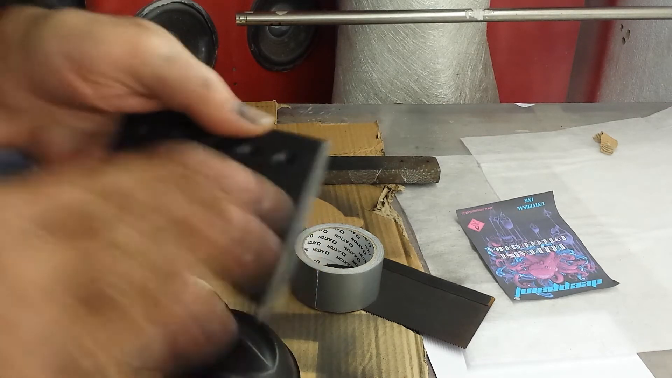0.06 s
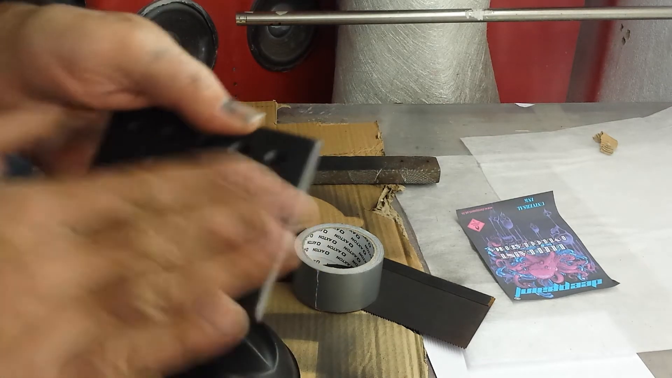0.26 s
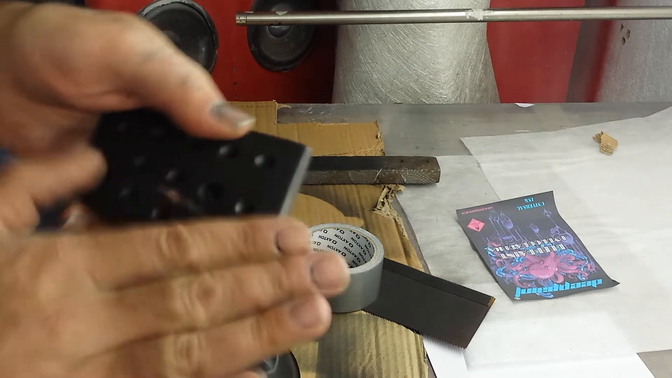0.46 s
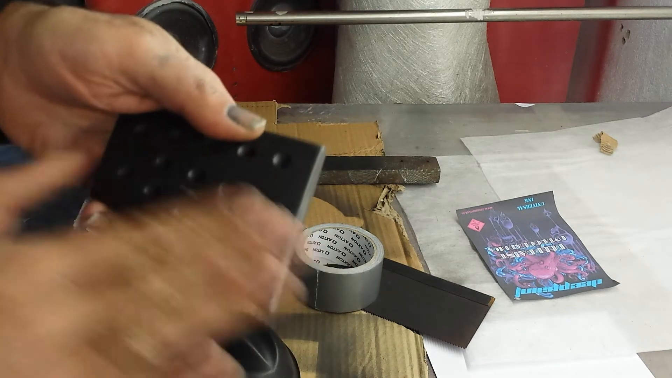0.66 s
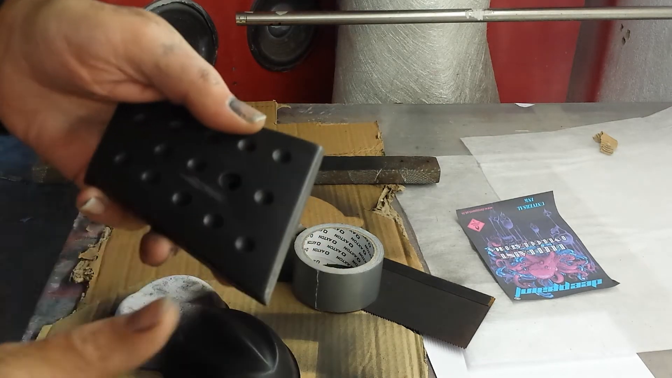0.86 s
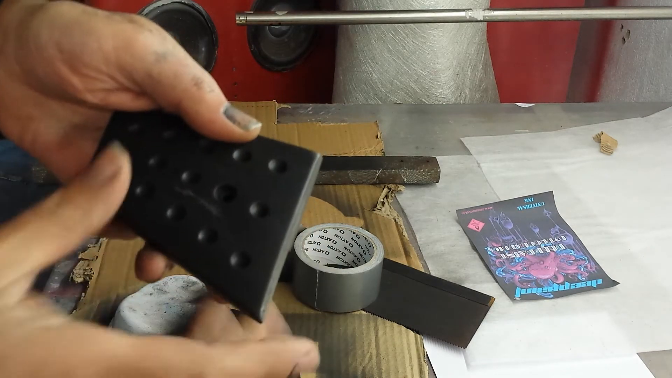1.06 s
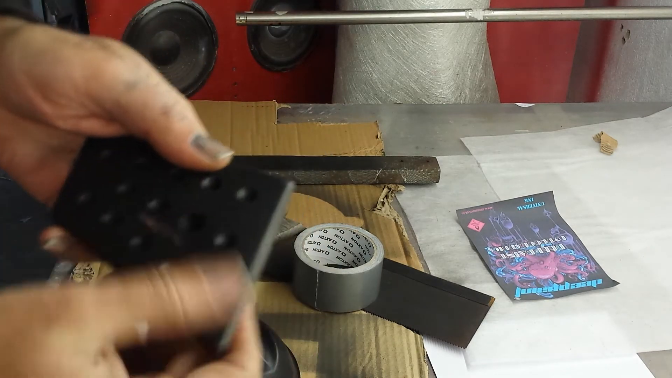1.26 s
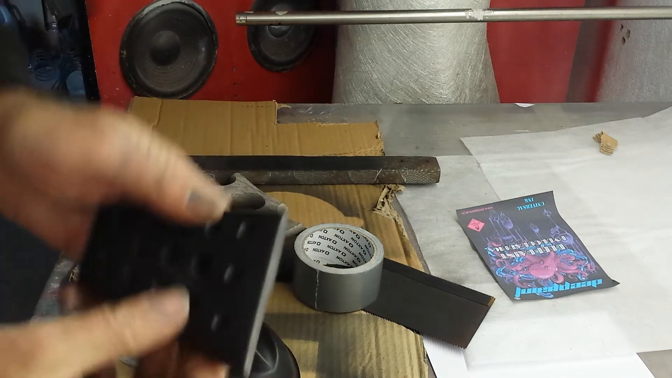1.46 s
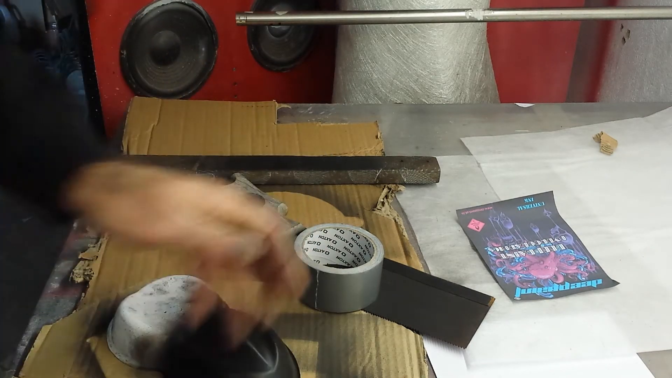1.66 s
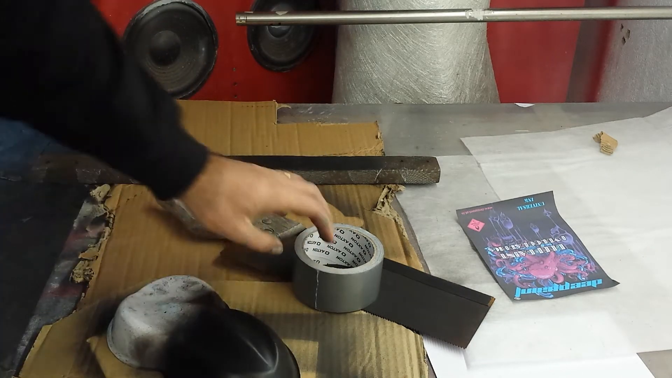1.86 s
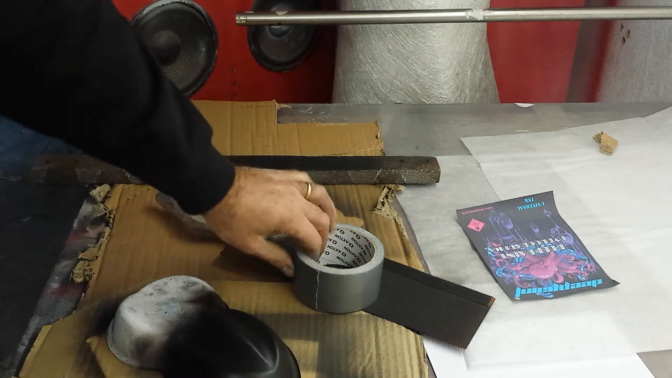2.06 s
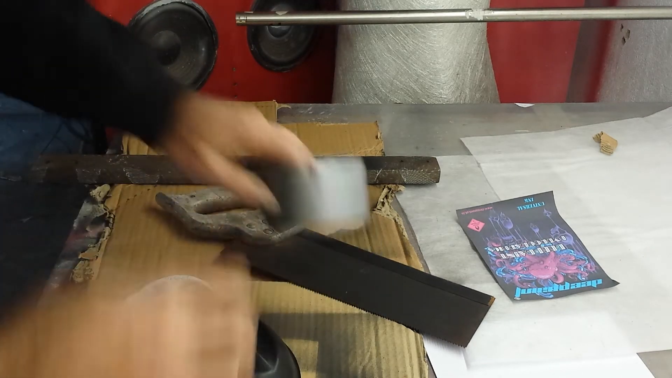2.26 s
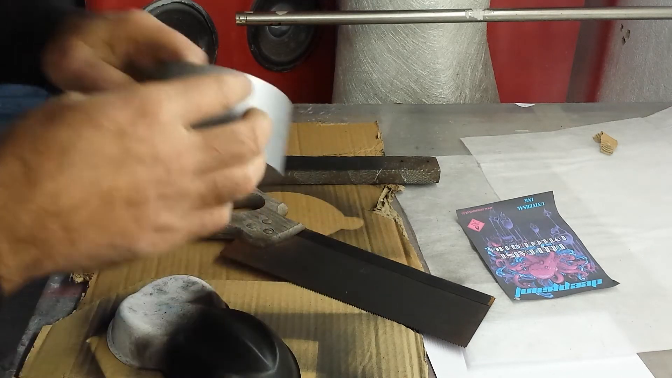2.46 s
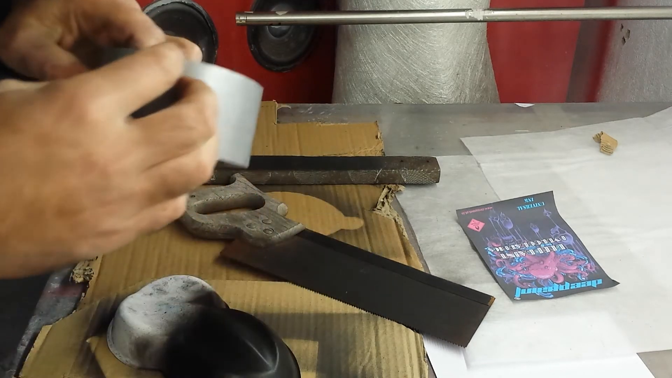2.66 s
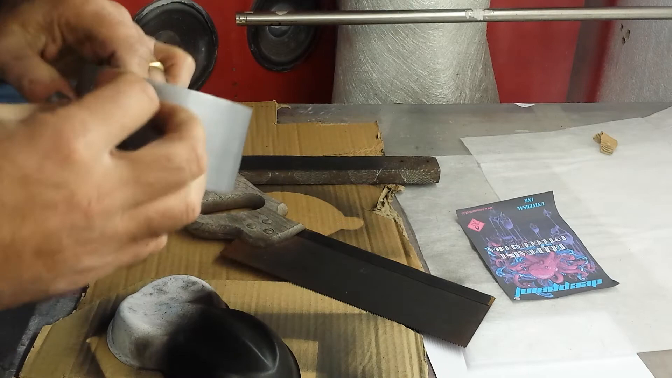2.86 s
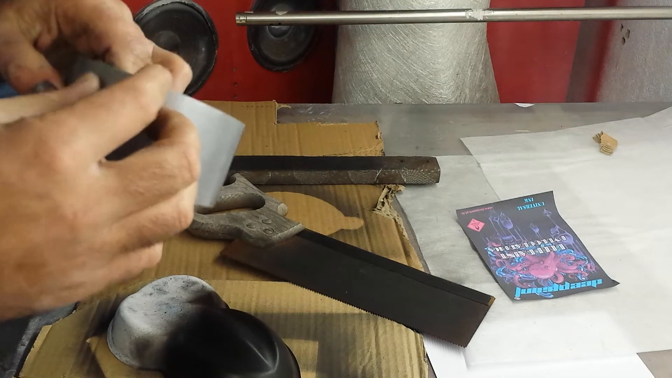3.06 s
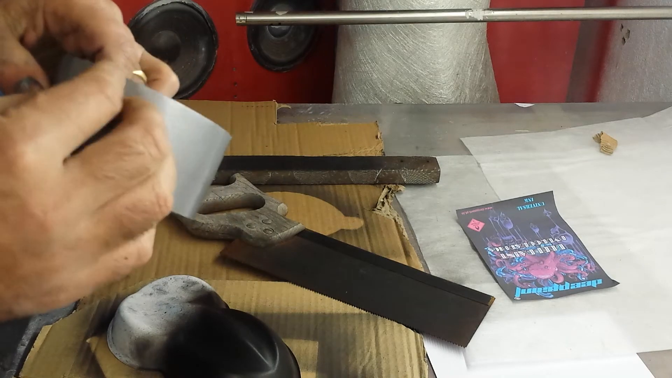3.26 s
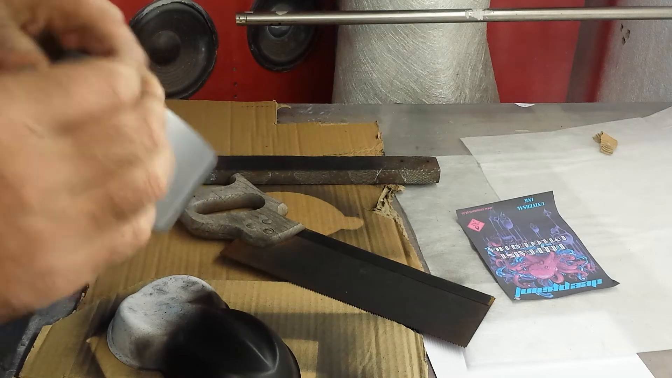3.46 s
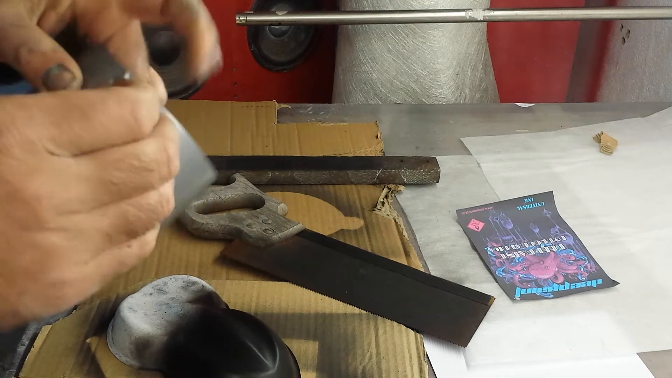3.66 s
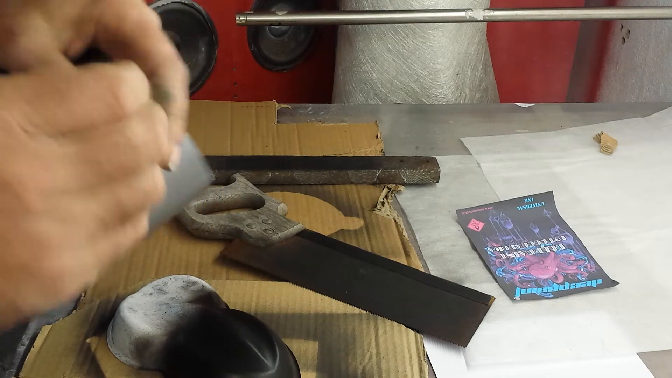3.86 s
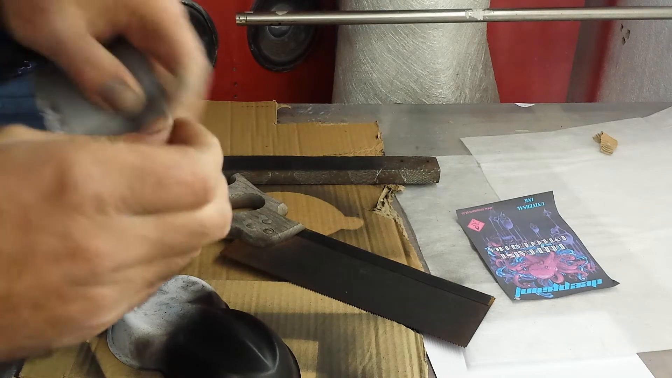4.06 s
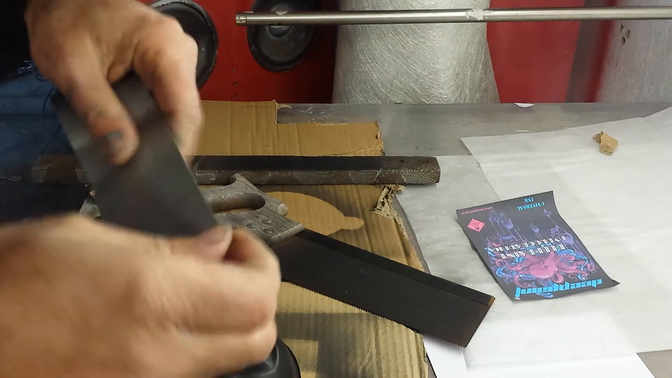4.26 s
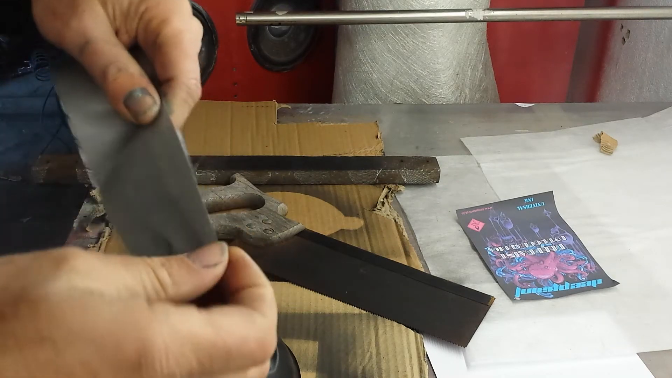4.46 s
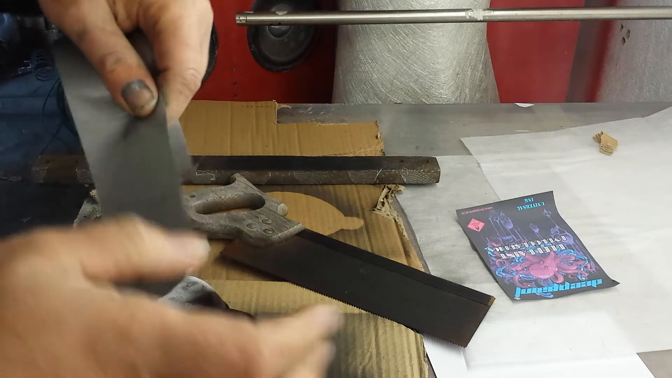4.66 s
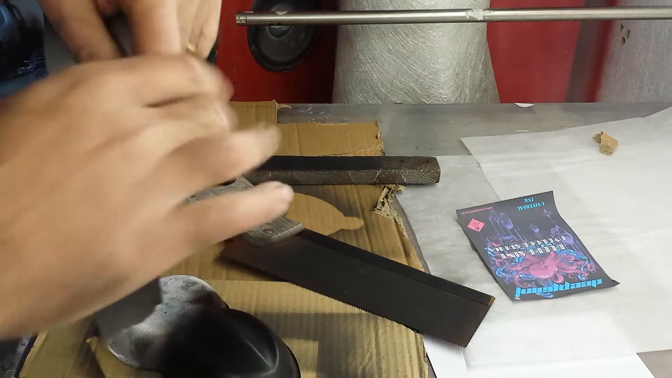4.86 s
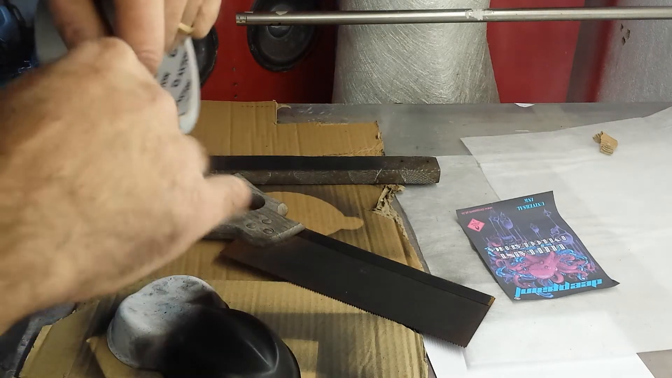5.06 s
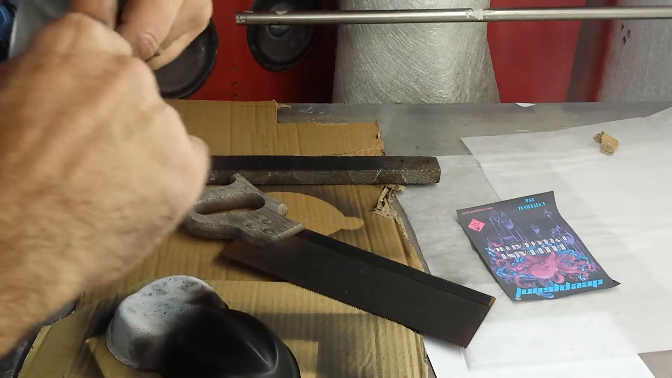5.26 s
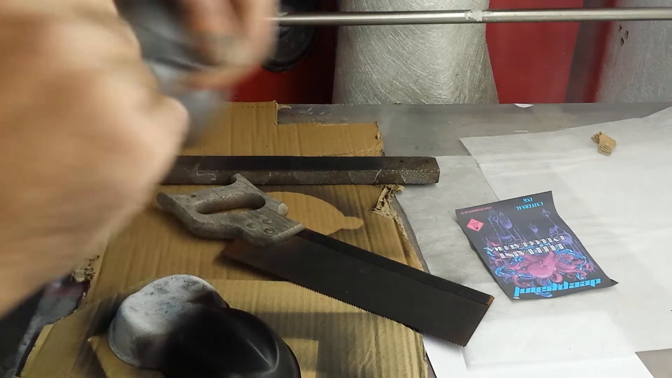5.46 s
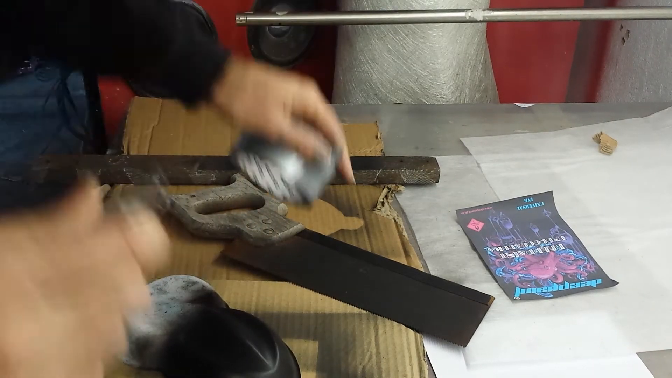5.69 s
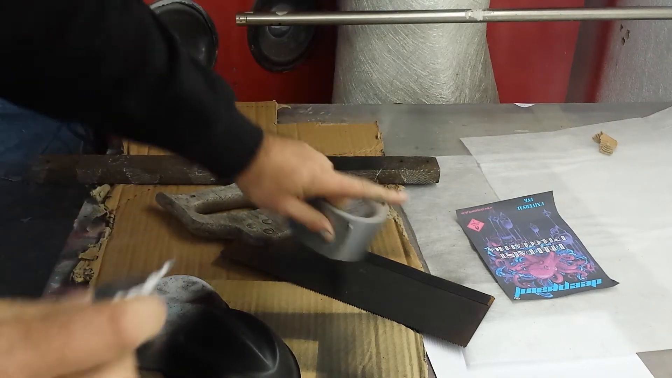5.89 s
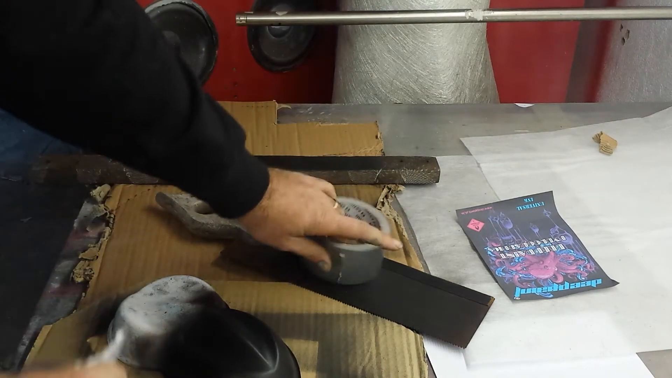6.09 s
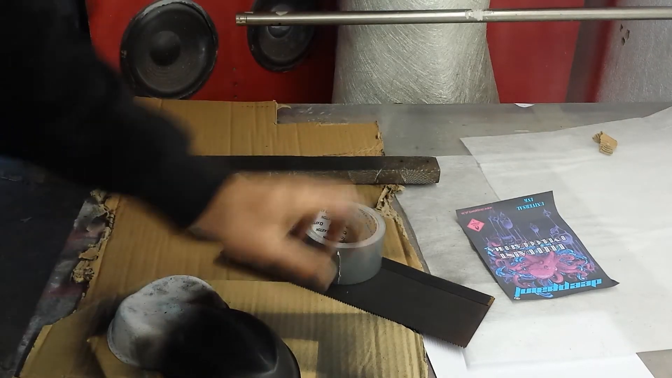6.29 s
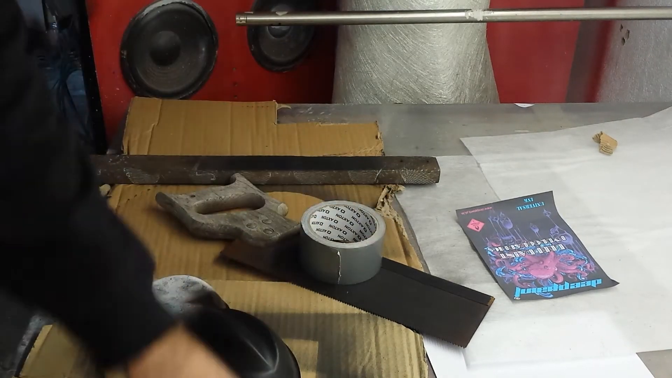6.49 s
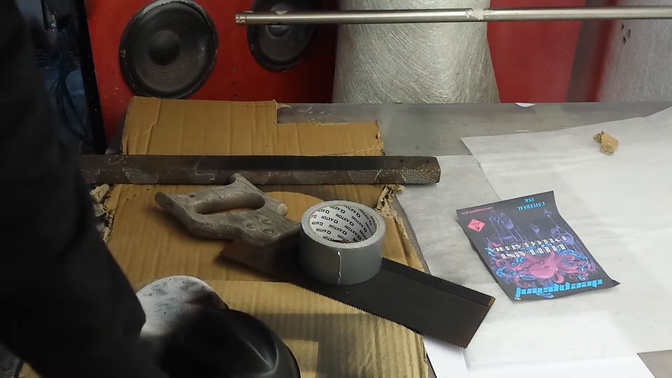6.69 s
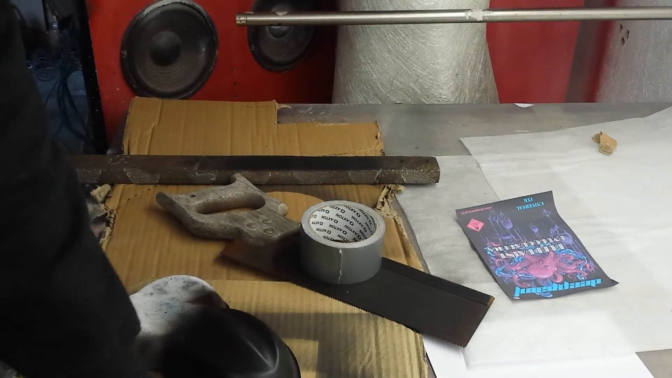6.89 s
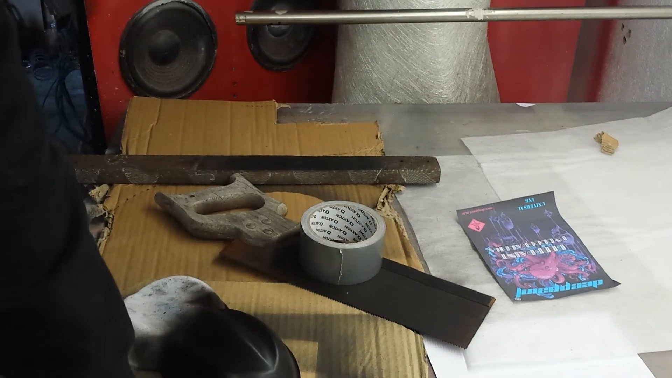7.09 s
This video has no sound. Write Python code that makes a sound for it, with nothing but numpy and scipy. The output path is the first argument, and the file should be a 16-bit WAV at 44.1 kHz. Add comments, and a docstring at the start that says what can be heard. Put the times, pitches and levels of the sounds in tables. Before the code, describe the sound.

Duct tape is ripped off its roll in short loud pulls and torn, between knocks on a workbench, over a faint fan hum.

```python
"""First a palm, close to the stereo microphone, wipes a plate on a workbench and lays it down with two
knocks that ring the bench top and clink a saw lying there. Then duct tape is picked loose, ripped off
its roll in two short pulls and torn across: the glue sticks, slips and snaps, shaking the backing.
The roll is dropped back on the bench and bounces. Behind it all a fan hums faintly in the small workshop."""
import sys
import numpy as np
from scipy import signal
from scipy.fft import rfft, irfft, next_fast_len
from scipy.io import wavfile
from scipy.ndimage import uniform_filter1d

SR = 44100
rng = np.random.default_rng(int(sys.argv[2]) if len(sys.argv) > 2 else 0)


def pcm_store(signal):
    """Save signal as 16-bit PCM."""
    levels = np.round(np.clip(np.atleast_2d(signal), -1, 1) * 32767)
    wavfile.write(sys.argv[1], SR, levels.astype(np.int16).T)


N = 314433
TIME = np.arange(N) / SR

# The tape, close up: two gentle peels, a pull that sticks halfway, the long rip, the tear across.
# Each row: start in seconds, length in seconds, level in dB, attack in seconds per 10 dB, swell in dB,
# slips per second, the slips' share of the power from 0 to 1, strip drumming in dB, rasp pitch in Hz.
TAPE_PULLS = [(3.424, .031, -50, .028, 0, 211, .35, -12, 1300),
              (3.473, .019, -41.5, .007, 0, 300, 0.16, -16, 900),
              (3.771, .031, -29, .003, 7, 450, .25, -7, 1750),
              (3.817, .028, -32, .002, -2, 238, .5, -5.5, 3000),
              (4.057, .101, -22, .001, 0, 206, .9, -0.5, 1580),
              (5.326, .079, -32, .016, 2, 480, .35, -6, 2550)]
# Single snaps. Each row: time in seconds, relative level in dB.
GLUE_JERKS = [(3.815, -10.5), (3.827, -11), (3.84, -14.5), (4.056, -16.5), (4.074, -13.5), (4.145, -13.5),
              (4.157, -16), (5.397, -20), (5.402, -17.5)]  # the glue lets go
DRY_TICKS = [(2.765, -49), (2.7736, -45.5), (3.3732, -46.5), (3.4111, -48), (4.5547, -45), (4.673, -55),
             (5.1609, -35), (5.251, -46), (5.402, -25), (5.7239, -40), (6.1253, -40), (6.132, -41),
             (6.15, -45)]  # handled tape, the tear's last snap, a scrape as the roll lands
# The taut strip. Each row: frequency in Hz, level in dB, time to fall 60 dB (t60) in seconds.
STRIP_MODES = [(340, -7.5, 0.017), (396, 0, 0.05), (457, -13, 0.014), (730, -7.5, 0.039), (887, -21, 0.082)]
# Things set down on the bench. Each row: start in seconds, settling delay in seconds, rebound spacing
# in seconds, weight in dB, clack in dB, hardness as a cutoff in Hz, roll's ring in dB, saw's clink in dB.
BENCH_KNOCKS = [(1.399, .004, .03, -46.5, -47.5, 900, -55, -51),
                (1.881, .002, .031, -23.5, -22.5, 2700, -31, -37),
                (1.999, 0.0019, .041, -17, -24, 1600, -28, -38),
                (6.021, 0.00696, .024, -20.5, -20.5, 1700, -16, -53),
                (6.093, .011, .036, -17, -22, 2200, -16, -36.5),
                (6.522, .016, .04, -29.5, -38.5, 2300, -38, -39.5),
                (6.641, 0.00193, .035, -30.5, -43, 600, -43, -52),
                (6.927, .002, .035, -41, -45, 930, -50, -60),
                (7.086, 0.0039, 0.036, -48, -49, 1500, -52, -50)]
# Ringing bodies. Each row: frequency in Hz, level in dB, t60 in seconds, left over right in dB.
BENCH_MODES = [(168, -26, .12, -19), (215, -12.5, 0.08, 0), (261, -12, 0.1, -8), (304, -13, 0.09, 15.5),
               (409, -13, 0.087, 12), (503, -14, 0.075, 5), (614.3, -15, 0.085, -2), (680, -14, 0.067, 10),
               (970, -18.5, 0.11, -2)]
RESTING_ROLL_MODES = [(72, -4, .17, 4), (172, -12, .12, -3), (254, -10, .12, -6), (398, -10, .08, -2),
                      (570, -17, .07, 1), (945, -20, .08, 2), (1200, -19, .08, 2), (1750, -21, .06, 4)]  # on its cardboard bed
HELD_ROLL_MODES = [(148, -8, 0.054, 3), (181, -3.5, 0.11, -3.5), (285, 0.5, 0.047, 5)]
SAW_MODES = [(1898, -2, 0.095, 9), (1950, -11, 0.11, 12), (1990, -17, 0.14, 5), (2084, -21, 0.22, 5),
             (2630, -16, 0.047, 12)]
# Slow hand slides and brief scuffs on plate or bench.
# Each row: middle in seconds, length in seconds, level in dB.
SLIDES_AND_SCUFFS = [(1.164, 0.72, -62), (1.98, .07, -53), (2.15, 0.25, -57), (6.135, .04, -50)]
# Arms lean on the bench. Each row: start in seconds, end in seconds, rumble in dB.
LEANING_ARMS = [(0, 1.38, -54.5), (6.66, 7.13, -48.5)]
# Tone colours at the microphone. Each row: frequency in Hz, relative spectral density in dB.
TAPE_SPECTRUM = [(100, -23), (260, -6), (560, -3), (750, -1), (1000, -7), (1380, 3), (1750, -2),
                 (2300, -1.5), (3150, -2), (3900, -5), (6000, -7.3), (10000, -16), (15000, -14.5)]
TICK_SPECTRUM = [(400, -25), (1200, 2), (2500, 6), (5000, 5), (9000, -2), (15000, 0.5)]
CLACK_SPECTRUM = [(50, -30), (130, -24), (230, 3), (320, 0), (600, -1), (900, -8.5), (1400, -10.5),
                  (2000, -9.5), (3200, -15.5), (8000, -22), (15000, -8)]
PALM_SPECTRUM = [(40, -18), (110, 0), (190, -5), (400, -1), (900, -9), (1500, -3.5), (2300, 2), (3500, -11),
                 (6000, -10.5), (10000, -16), (15000, -12)]
AIR_SPECTRUM = [(25, -24), (45, 0), (110, -8), (150, -7), (320, -11), (600, -11), (1000, -13),
                (1500, -17.5), (2200, -22.5), (3000, -26), (5000, -31), (10000, -33.5), (15500, -32)]
# Where tape and hands sit in the stereo picture. Each row: frequency in Hz, left over right in dB.
TAPE_BALANCE = [(150, 0), (450, 0), (850, 0), (1400, 7), (2300, 9.5), (3100, 8), (4000, 1), (6000, 1.5),
                (14000, -1.5)]
HAND_BALANCE = [(130, -7), (500, -3.5), (2200, 8), (8000, -3.5)]
# The fan and its housing. Each row: frequency in Hz, width in Hz, rms level in dB, left over right in dB.
FAN_RESONANCES = [(49.3, 6, -75, -6), (71.7, 2.1, -62.5, -12), (111.6, 13, -58, -4),
                  (201.3, 6.8, -61.5, -8), (520.6, 16, -65.5, -2), (646.7, 25, -57.5, 0),
                  (718.4, 13, -65.5, -7), (1000.7, 23, -66, 15.5)]
# The rush of air from the fan. Each row: time in seconds, relative level in dB.
AIR_LEVELS = [(0, -55), (1.3, -55), (1.7, -57), (3.2, -57), (4.5, -54.5), (5.8, -55.5), (7.1, -52.5)]
# How alike the microphone's two sides are. Each row: frequency in Hz, correlation from -1 to 1.
STEREO_LIKENESS = [(40, 0.99), (130, 0.98), (350, 0.76), (900, 0.38), (2000, 0.056), (6000, -0.13),
                   (15000, -0.15)]
# The workshop's reverberation. Each row: frequency in Hz, t60 in seconds.
ROOM_DECAY = [(100, 0.47), (400, 0.32), (1200, 0.36), (2600, 0.37), (7000, 0.3), (15000, 0.15)]


def tape(tug_db=-25, sizzle_db=1.5, sizzle_limit_db=-46):
    """Close up, slips and snapping glue threads shake the backing, drum the strip and tug at the roll."""
    level, per_s, share, drum_db, rasp_hz, brake = pulling()
    jerk_s, jerk_db = np.transpose(GLUE_JERKS)
    jitter = .03 * share + .35 * (1 - share)  # the more the slips dominate, the steadier their rate
    slips = level * np.sqrt(share) * stick_slip(per_s, jitter, spread_db=1.7)
    snaps = np.array([crackle(per_s=9000, spread_db=4) for side in range(2)])
    threads = level * np.sqrt(1 - share) * snaps
    force = splinter(slips + clicks(jerk_s, jerk_db + 14), t60=.017, share=.8) + threads
    backing = convolve(force, colour(TAPE_SPECTRUM, TAPE_BALANCE))
    rasp = from_db(-5) * backing + from_db(.5) * gliding_resonance(backing, rasp_hz, width_hz=1100)
    # The finest threads sizzle even in a gentle peel.
    sizzle_level = np.minimum(from_db(sizzle_db) * level, from_db(sizzle_limit_db))
    sizzle = sizzle_level * filtered(snaps[::-1], 1, [3500, 12000], "band")
    drive = np.diff((slips + threads[0]) * from_db(drum_db), prepend=0)
    strip = sum(from_db(db) * ring(drive, hz, t60) for hz, db, t60 in STRIP_MODES)
    held_roll = struck(from_db(tug_db) * slips * share * brake, HELD_ROLL_MODES)
    return convolve(strip - rasp + sizzle, scatter(t60=.12, echo_db=-2)) + held_roll


def pulling(release_db_per_s=1000, brake_s=.045):
    """Each pull takes up, swells, brakes and lets go; the strongest one governs the tape."""
    levels_db = []
    for start, length, db, attack, swell_db, *_ in TAPE_PULLS:
        swell = swell_db * (np.clip((TIME - start) / length, 0, 1) - .5)
        take_up = 10 * np.maximum(start - TIME, 0) / attack
        release = release_db_per_s * np.maximum(TIME - start - length, 0)
        levels_db.append(db + swell - take_up - release)
    strongest = np.argmax(levels_db, axis=0)
    start, length, *_, per_s, share, drum_db, rasp_hz = np.transpose(TAPE_PULLS)[:, strongest]
    level = from_db(np.maximum(np.max(levels_db, axis=0), -140))
    # As the hand brakes the slips slow down, the rasp falls and the longer strip drums more.
    brake = np.clip(1 + (TIME - start - length) / brake_s, 0, 1)
    return level, per_s * (1 - .3 * brake), share, drum_db + 7 * brake, rasp_hz * 2 ** (-.2 * brake), brake


def stick_slip(per_s, jitter, spread_db):
    """Tension builds, then the glue line jumps: an uneven train of slips at unit power."""
    rate = per_s * np.exp(jitter * waver(130))
    jumps = np.diff(np.floor(np.cumsum(rate) / SR), prepend=0)
    sizes = from_db(spread_db * np.clip(rng.standard_normal(N), -1.5, 1.5))
    return unit_power(jumps * sizes / np.sqrt(per_s))


def crackle(per_s, spread_db):
    """Glue threads snap at random moments; unit power."""
    snaps = (rng.random(N) < per_s / SR) * rng.choice([-1, 1], N)
    return unit_power(snaps * from_db(spread_db * rng.standard_normal(N)))


def splinter(pulses, t60, share):
    """Each pulse breaks into a sharp snap and a brief burst of smaller ones."""
    decay = from_db(-120 / (t60 * SR))
    burst = np.sqrt(signal.lfilter([1 - decay], [1, -decay], pulses ** 2 + 1e-18))
    return np.sqrt(1 - share) * pulses + np.sqrt(share) * burst * stereo_noise(N)


def squeak(start_s=3.47, length_s=.025, level_db=-47.5, rise_hz_per_s=7000, fade_db_per_s=2600):
    """As the loose end lifts, the slips lock for a moment into a rough rising note."""
    hz = 670 + rise_hz_per_s * np.clip(TIME - start_s, 0, length_s)
    rough_hz = hz * (1 + .053 * waver(150))
    note = np.sqrt(2) * np.sin(2 * np.pi * np.cumsum(rough_hz) / SR)
    fade_db = np.minimum(fade_db_per_s * outside(start_s, start_s + length_s), 120)
    return from_db(level_db - fade_db) * note * pan(2)


def ticks():
    """Short dry ticks of handled tape, the tear's last snap, and a scrape as the roll lands."""
    times, db = np.transpose(DRY_TICKS)
    snaps = splinter(clicks(times, db + 18.5), t60=.008, share=.8)
    scattered = convolve(snaps, scatter(t60=.08, echo_db=-3))
    return convolve(scattered, colour(TICK_SPECTRUM))


def contacts():
    """A thing set down touches with an edge, settles with its weight and rebounds twice."""
    rows = []
    for start, settle, rebound, weight_db, clack_db, hard_hz, roll_db, _ in BENCH_KNOCKS:
        rows += [(start, weight_db - 20, clack_db, hard_hz, roll_db - 6),
                 (start + settle, weight_db, clack_db - 6, hard_hz * .45, roll_db),
                 (start + rebound, weight_db - 16, clack_db - 4, hard_hz * .68, roll_db - 11),
                 (start + 2 * rebound, weight_db - 16, clack_db - 12.5, hard_hz * .3, roll_db - 15)]
    return np.transpose([row for row in rows if row[0] < TIME[-1]])


def bench(times, clacks_db, hardness_hz, size=4096):
    """Each blow clacks and sets the bench top ringing; a soft contact dulls the clack."""
    blows = np.zeros((2, N + size))
    for start, db, cutoff_hz in zip(times, clacks_db, hardness_hz):
        at = int(start * SR)
        blow = scatter(t60=.09, echo_db=8, size=size)
        blows[:, at:at + size] += from_db(db) * filtered(blow, 3, cutoff_hz, "low")
    clack = from_db(24) * convolve(blows, colour(CLACK_SPECTRUM, HAND_BALANCE))
    return struck(clicks(times, clacks_db), BENCH_MODES) + clack


def resting_roll(times, roll_db):
    """The roll of tape rings on its cardboard bed at every contact."""
    return struck(clicks(times, roll_db), RESTING_ROLL_MODES)


def boom(times, weight_db, hz=126.4, swell_t60=.08, fade_t60=.245):
    """The bench's frame thuds, and its lowest mode feeds a standing wave of the room, off to the right."""
    push = clicks(times, weight_db)
    thud = from_db(-27) * ring(push, hz=53.4, t60=.28)
    board = ring(push, hz, swell_t60) * 2 * np.log(1000) / (swell_t60 * SR)
    standing_wave = from_db(-2) * pan(-17) * ring(board, hz, fade_t60)
    return thud + standing_wave


def saw(rebound_db=-4):
    """A saw lying on the bench clinks at each knock and again at its rebound."""
    start, _, rebound, *_, clink_db = np.transpose(BENCH_KNOCKS)
    rebounds = clicks(np.minimum(start + rebound, TIME[-1]), clink_db + rebound_db)
    return struck(clicks(start, clink_db) + rebounds, SAW_MODES)


def palm(count=6, every_s=.118, length_s=.084, arm_fade_db_per_s=85):
    """Close up, skin wipes to and fro over the plate, lighter each time; the arms rumble on the bench."""
    wipes = [(.023 + k * every_s, length_s, -50 - .4 * k) for k in range(count)]
    speed = sum(from_db(db) * np.exp(-(2 * (TIME - middle) / length) ** 2)
                for middle, length, db in wipes + SLIDES_AND_SCUFFS)
    noise = stereo_noise(N)
    leaning = sum(from_db(db - arm_fade_db_per_s * outside(start, end)) for start, end, db in LEANING_ARMS)
    rumble = leaning * pan(-5.5) * unit_power(ring(noise, hz=113, t60=.099))
    return convolve(speed * noise, colour(PALM_SPECTRUM, HAND_BALANCE)) + rumble


def scatter(t60, echo_db, size=8192):
    """The path to the microphone: direct sound, then reflections off hands and bench; unit energy."""
    spray = stereo_noise(size) * 1000 ** (-TIME[:size] / t60)
    response = from_db(echo_db) * unit_power(spray) / np.sqrt(size)
    response[:, 0] += 1
    return unit_power(response) / np.sqrt(size)


def workshop(x, build_s=.02, size=26000):
    """The room's diffuse tail dies away band by band."""
    edges_hz = np.geomspace(60, 17000, 9)
    t, tail = TIME[:size], 0
    for low, high in zip(edges_hz, edges_hz[1:]):
        band = filtered(stereo_noise(size), 2, [low, high], "band")
        tail = tail + band * 1000 ** (-t / at_hz(ROOM_DECAY, np.sqrt(low * high)))
    response = unit_power(tail * (1 - np.exp(-t / build_s))) / np.sqrt(size)
    return convolve(filtered(x, 2, 170, "high"), response)  # so small a room has no diffuse bass


def fan():
    """In the background, a rush of air and a hum wavering in the narrow resonances of fan and housing."""
    noise = stereo_noise(N)
    hum = sum(from_db(db) * pan(side_db) * unit_power(ring(noise, hz, np.log(1000) / (np.pi * width)))
              for hz, width, db, side_db in FAN_RESONANCES)
    air_db = np.interp(TIME, *np.transpose(AIR_LEVELS))
    return hum + from_db(air_db + 4.5) * convolve(stereo_noise(N), colour(AIR_SPECTRUM))


def struck(x, modes, attack_s=.00036, size=16384):
    """A body rings in its modes, each with its own place between left and right."""
    t = TIME[:size]
    rings = sum(from_db(db - 60 * t / t60) * pan(side_db) * np.sin(2 * np.pi * hz * t)
                for hz, db, t60, side_db in modes)
    return convolve(x, rings * (1 - np.exp(-t / attack_s)))


def ring(x, hz, t60):
    """One mode: a unit click starts a decaying sine of height 1."""
    radius, angle = from_db(-60 / (t60 * SR)), 2 * np.pi * hz / SR
    return signal.lfilter([0, np.sin(angle)], [1, -2 * radius * np.cos(angle), radius ** 2], x + 1e-18)


def gliding_resonance(x, centre_hz, width_hz, count=12):
    """A band-pass whose centre moves by fading between neighbouring stationary bands."""
    centres, out = np.geomspace(700, 3400, count), 0
    place = np.interp(centre_hz, centres, np.arange(count))
    radius = np.exp(-np.pi * width_hz / SR)
    feedforward = (1 - radius ** 2) / 2 * np.array([1, 0, -1])
    for k, hz in enumerate(centres):
        share = np.maximum(1 - np.abs(place - k), 0)
        feedback = [1, -2 * radius * np.cos(2 * np.pi * hz / SR), radius ** 2]
        out = out + signal.lfilter(feedforward, feedback, x * share + 1e-18)
    return out


def colour(spectrum, balance=None, size=4096):
    """Minimum-phase stereo response of unit energy with this spectrum and balance."""
    hz = np.arange(size // 2 + 1) * SR / size
    gain = from_db(at_hz(spectrum, hz)) * pan(at_hz(balance, hz) if balance else 0)
    cepstrum = irfft(np.log(gain))
    cepstrum[:, 1:size // 2] *= 2
    cepstrum[:, size // 2 + 1:] = 0
    return unit_power(irfft(np.exp(rfft(cepstrum)))) / np.sqrt(size)


def stereo_noise(size):
    """White noise, alike on both sides in the bass and nearly unrelated in the treble."""
    padded = next_fast_len(size, True)
    mid, side = rfft(rng.standard_normal((2, padded)).astype("float32"))
    alike = at_hz(STEREO_LIKENESS, np.arange(len(mid)) * SR / padded)
    mid, side = np.sqrt((1 + alike) / 2) * mid, np.sqrt((1 - alike) / 2) * side
    return irfft(np.array([mid + side, mid - side], "complex64"), padded)[:, :size]


def waver(size):
    """Random drift of unit power, smoothed over this many samples."""
    return unit_power(uniform_filter1d(rng.standard_normal(N), size))


def clicks(times, levels_db):
    """Single-sample blows."""
    out = np.zeros(N)
    out[(times * SR).astype(int)] = from_db(levels_db)
    return out


def convolve(x, response):
    """Pass a sound through an impulse response."""
    x, response = np.atleast_2d(x, response)
    return signal.oaconvolve(x.astype("float32"), response.astype("float32"), axes=1)[:, :N]


def filtered(x, order, hz, kind):
    """Low-, high- or band-pass with a flat passband."""
    return signal.sosfilt(signal.butter(order, hz, kind, fs=SR, output="sos"), x)


def outside(start, end):
    """Seconds before or after a span; zero within it."""
    return np.maximum(np.maximum(start - TIME, TIME - end), 0)


def at_hz(points, hz):
    """Read a table on a log-frequency axis."""
    table_hz, values = np.transpose(points)
    return np.interp(np.log(np.maximum(hz, 1)), np.log(table_hz), values)


def pan(db):
    """Left and right gains; positive dB leans left."""
    return from_db(np.array([[.5], [-.5]]) * db)


def from_db(db):
    """Decibels to gain."""
    return 10 ** (np.asarray(db) / 20)


def unit_power(x):
    """Scale to an rms of 1."""
    return x / np.sqrt(np.mean(x ** 2) + 1e-20)


def scene():
    """Hands and tape close to the microphone, the bench below, the room around, the fan behind."""
    near = tape() + squeak() + ticks() + palm()
    times, weight_db, clack_db, hardness_hz, roll_db = contacts()
    knocks = bench(times, clack_db, hardness_hz) + saw()
    roll = resting_roll(times, roll_db)
    into_room = from_db(-16) * near + from_db(-6) * knocks + from_db(-13.5) * roll
    return near + knocks + roll + boom(times, weight_db) + workshop(into_room) + fan()


def record(dry):
    """The microphone sheds the bass below 41 Hz; the top is cut steeply at 15.8 kHz."""
    thin = filtered(dry, 4, 41, "high")
    return signal.sosfilt(signal.ellip(10, .2, 80, 15800, fs=SR, output="sos"), thin)


dry = scene()
out = record(dry)
pcm_store(out)
```